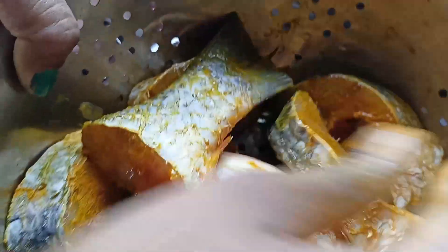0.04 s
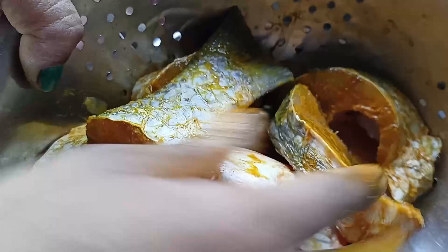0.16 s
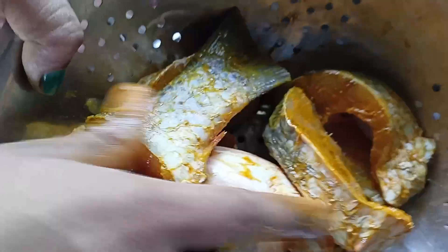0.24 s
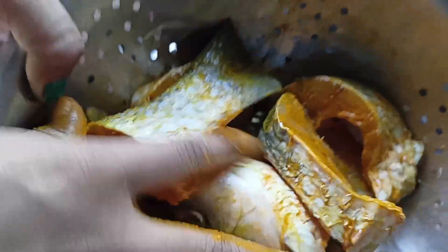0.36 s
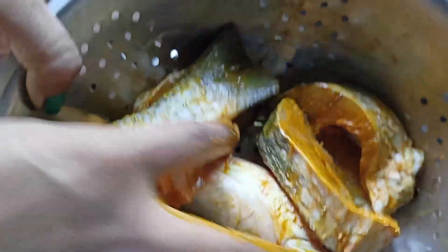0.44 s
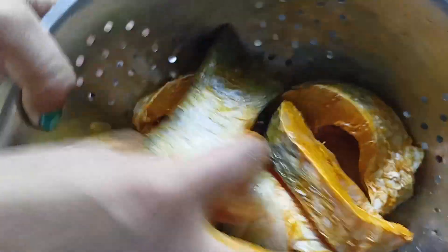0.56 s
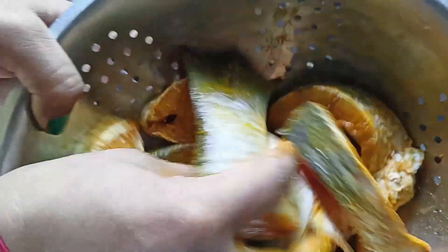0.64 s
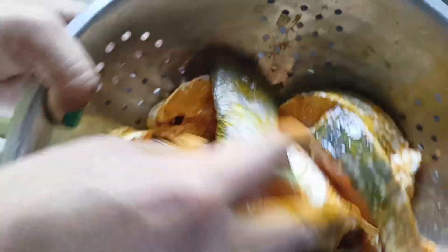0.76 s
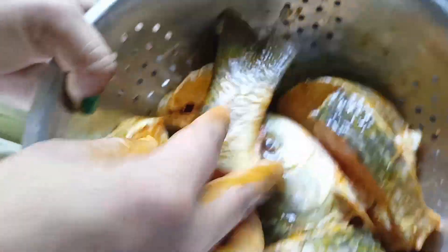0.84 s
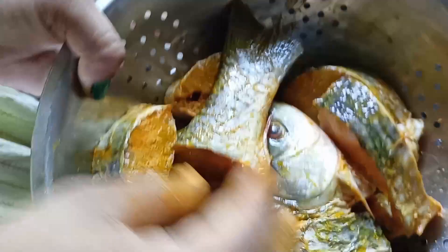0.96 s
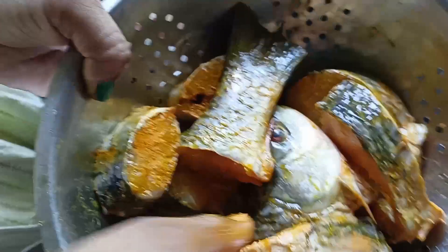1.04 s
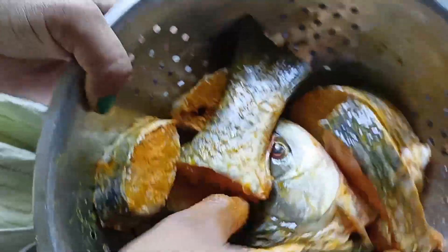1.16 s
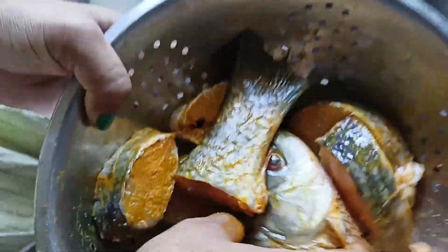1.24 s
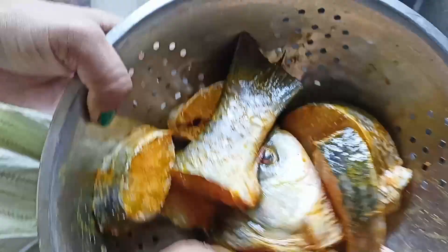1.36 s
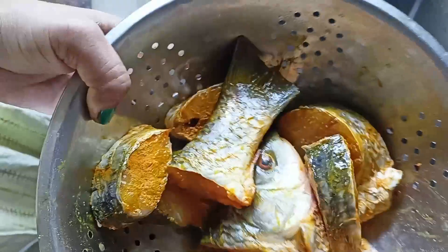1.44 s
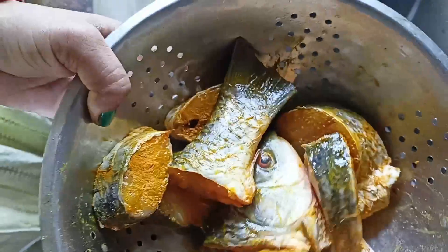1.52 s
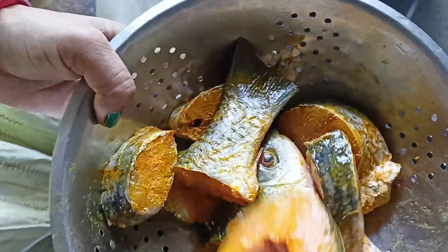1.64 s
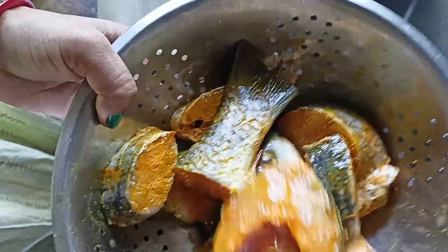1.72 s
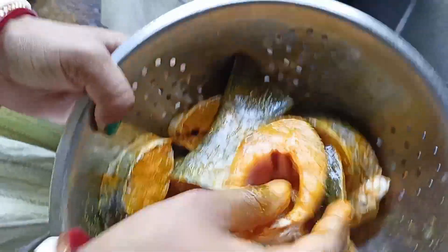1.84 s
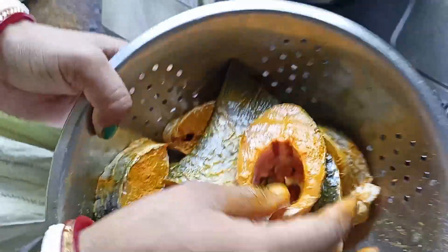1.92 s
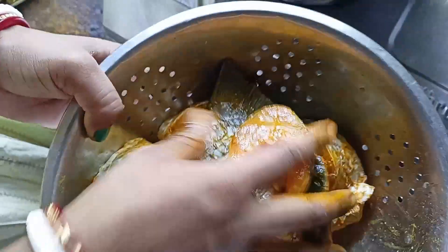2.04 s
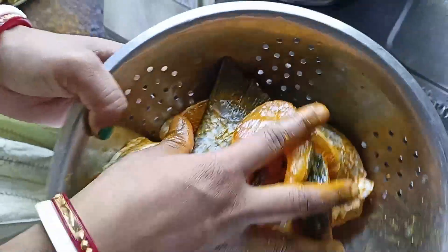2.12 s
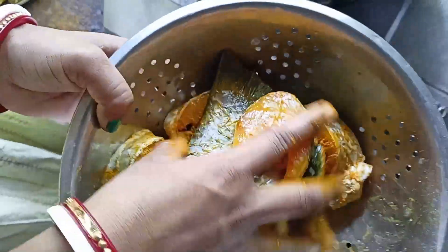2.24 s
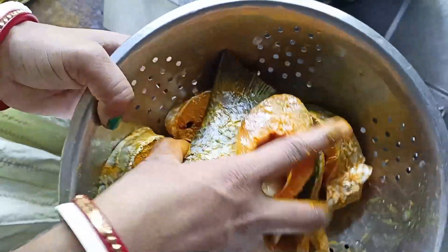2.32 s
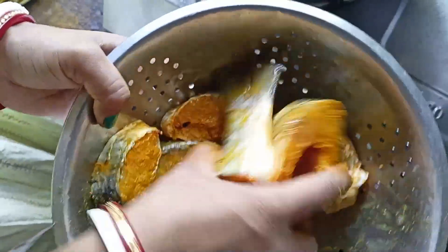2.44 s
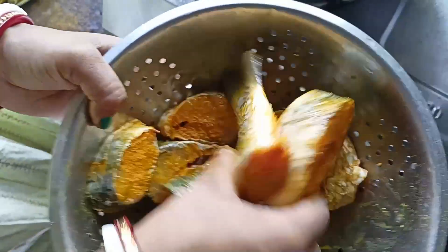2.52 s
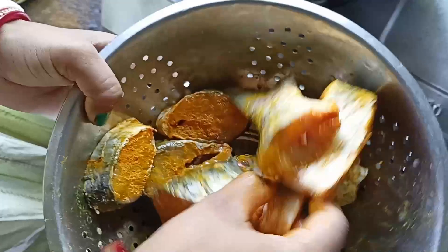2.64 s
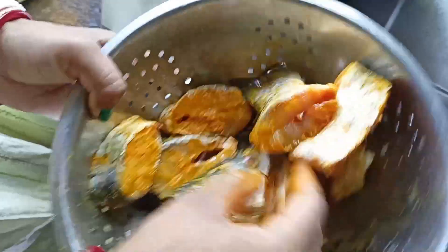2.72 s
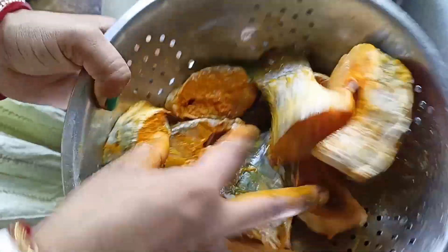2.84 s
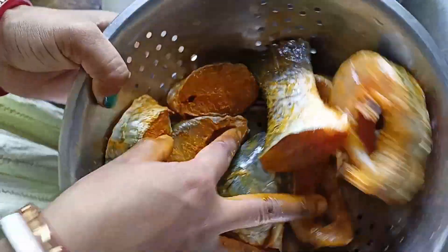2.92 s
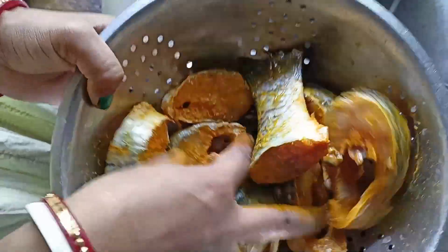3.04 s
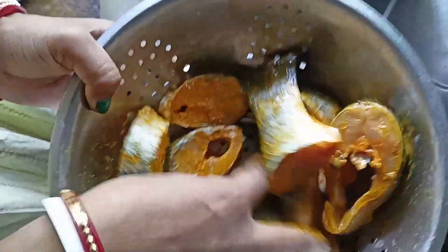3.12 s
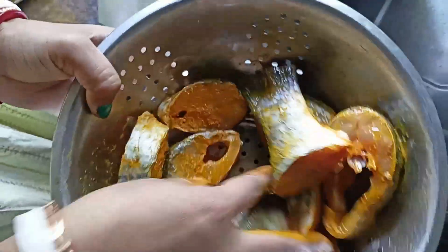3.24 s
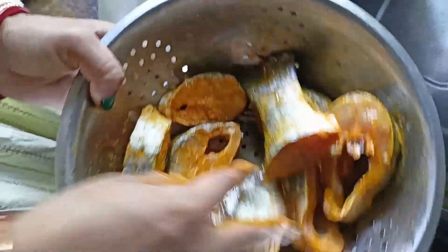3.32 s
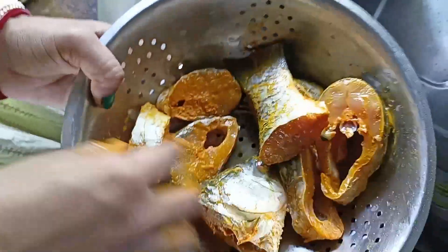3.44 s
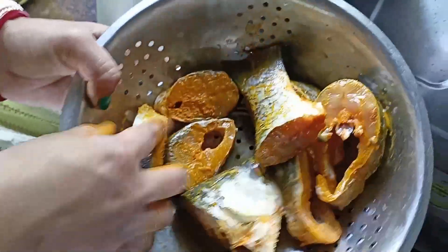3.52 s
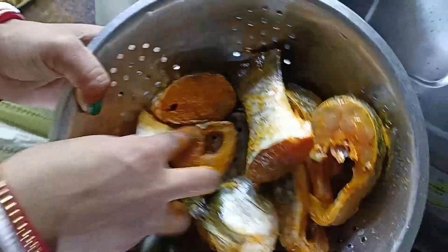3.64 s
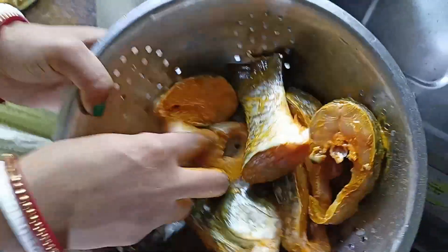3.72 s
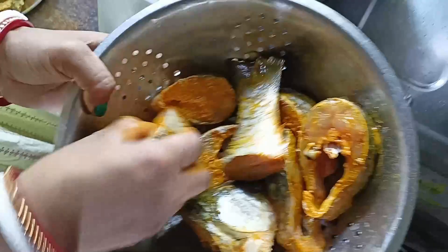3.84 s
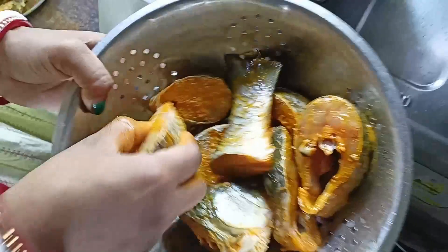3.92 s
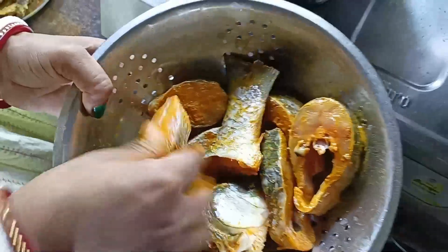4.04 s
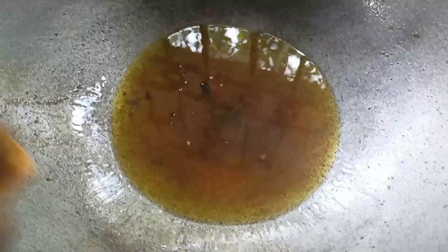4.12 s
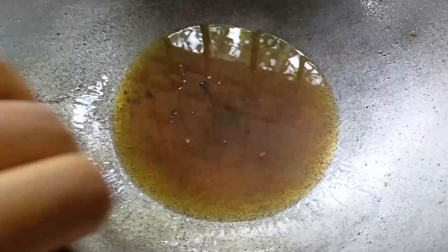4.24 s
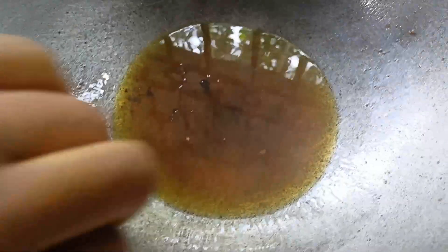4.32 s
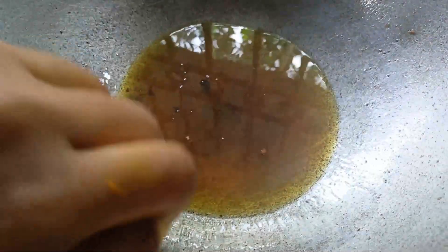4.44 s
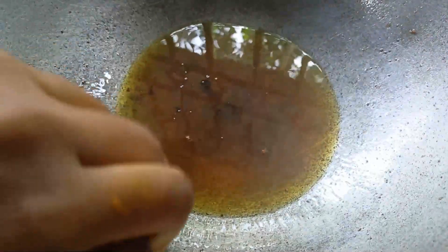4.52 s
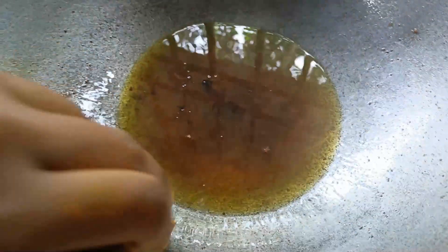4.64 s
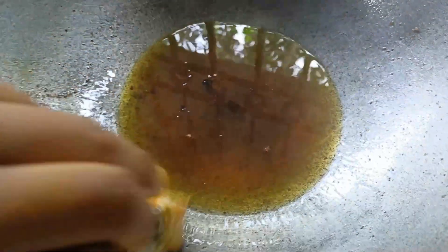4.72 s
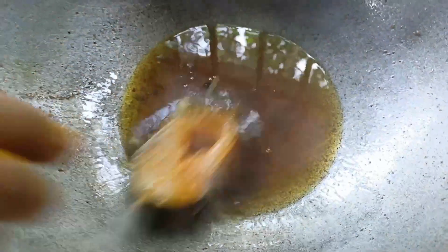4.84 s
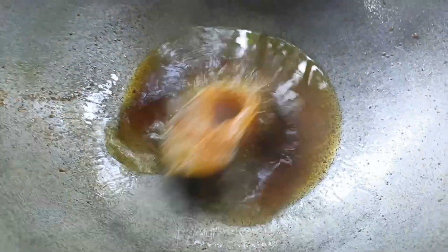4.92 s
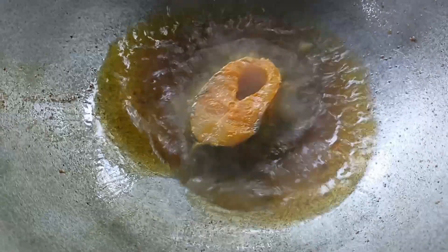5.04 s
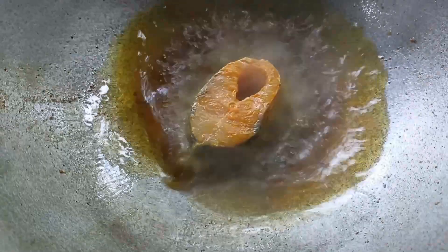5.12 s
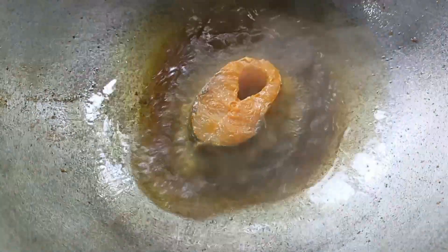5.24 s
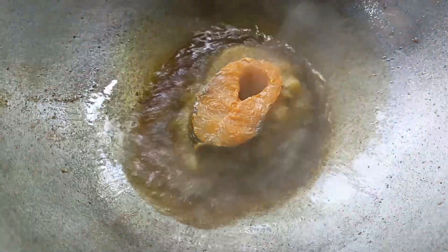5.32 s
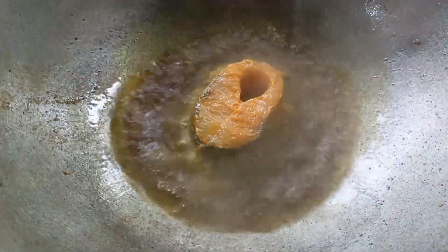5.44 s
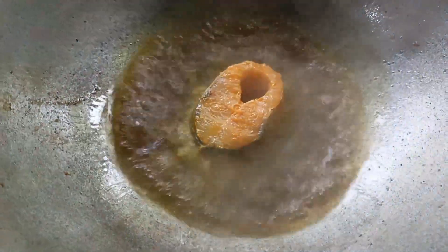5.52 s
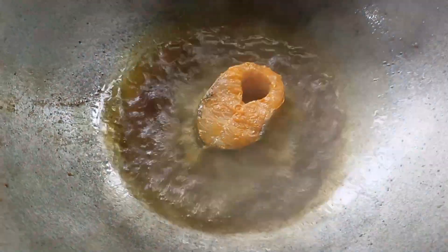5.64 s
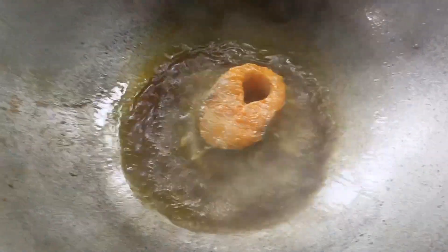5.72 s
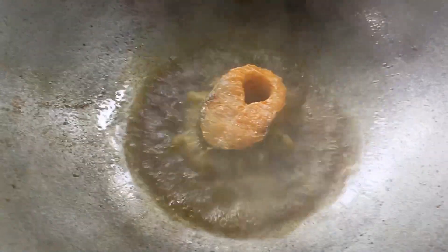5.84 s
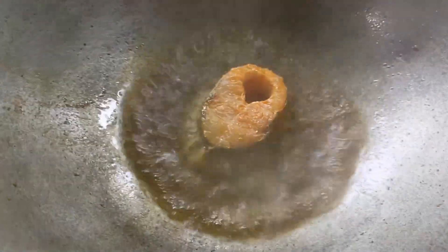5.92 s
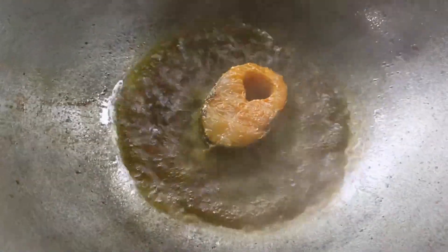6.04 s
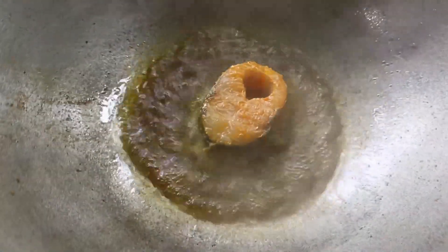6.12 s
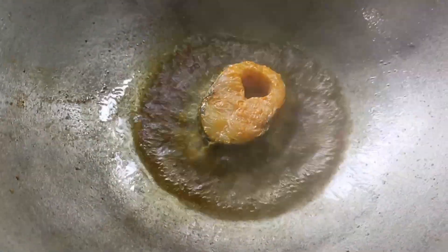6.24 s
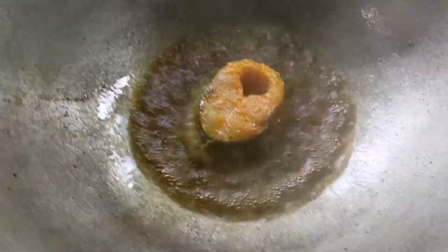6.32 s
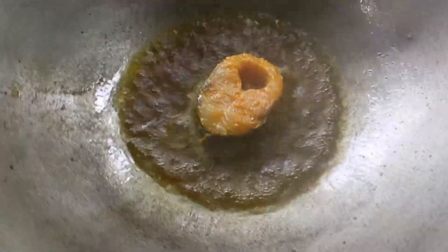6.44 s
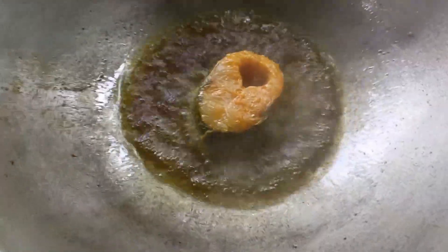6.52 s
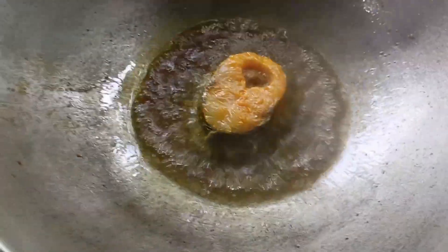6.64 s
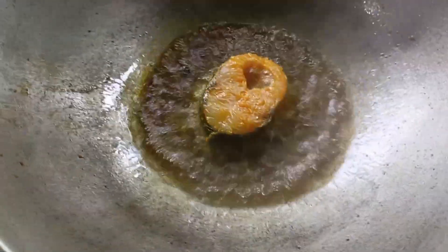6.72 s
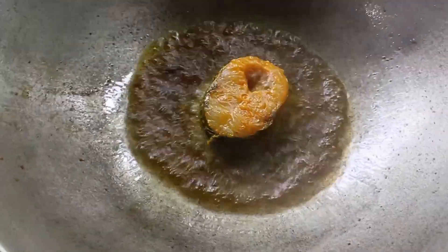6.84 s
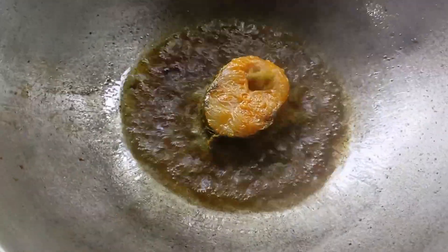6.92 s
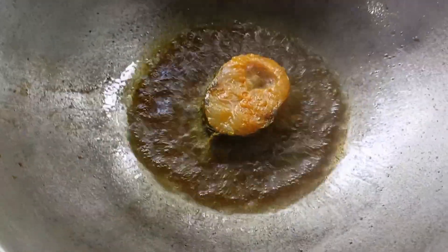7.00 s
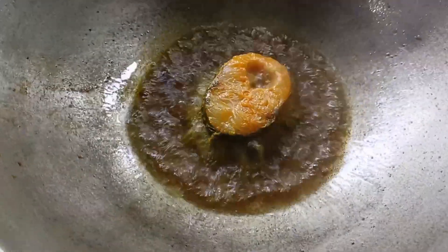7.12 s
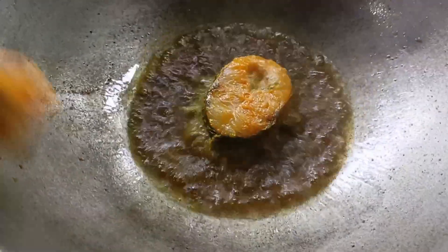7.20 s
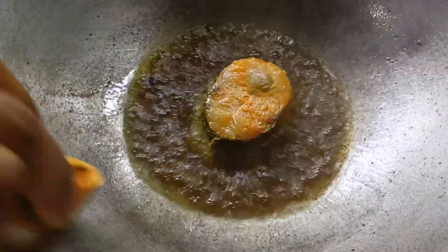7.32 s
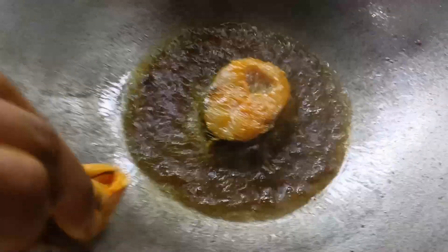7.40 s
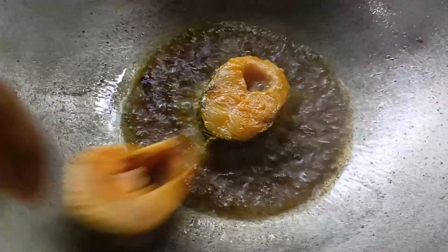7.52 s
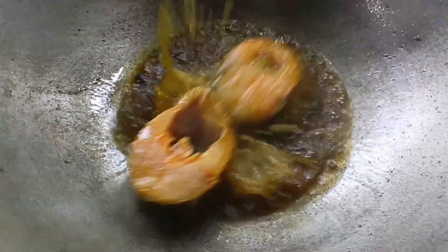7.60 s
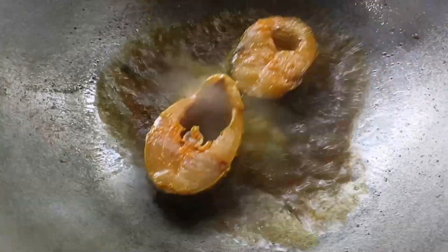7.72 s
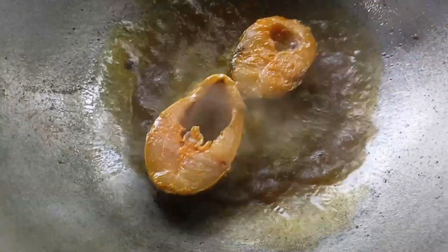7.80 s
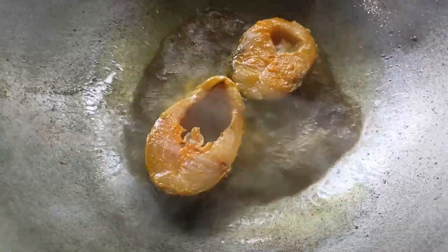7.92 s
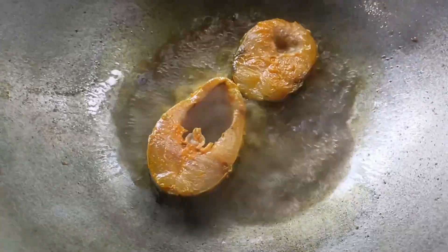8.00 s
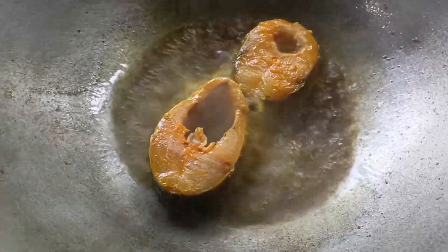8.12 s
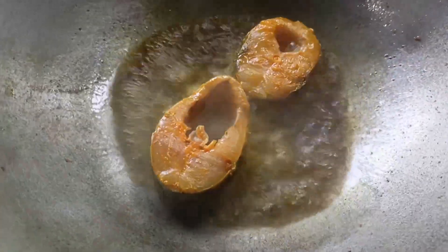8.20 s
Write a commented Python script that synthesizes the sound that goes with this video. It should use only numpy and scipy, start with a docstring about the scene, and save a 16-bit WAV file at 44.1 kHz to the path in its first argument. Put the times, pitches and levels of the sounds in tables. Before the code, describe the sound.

From 0 to about 4.15 seconds, wet fish steaks are turned by hand in a steel colander, heard close up. Uneven strokes of slippery rubbing, low rumble and gritty scraping follow one another, with bangles rattling on the rim. Sharper metallic knocks come near 0.7, 2.25, 2.9 and 3.3 seconds, ringing briefly; soft dull flops of flesh fall around 0.5 and 1.7 to 2.0. A distant bird repeats quick up-and-down whistles, frequent until about 2.1 and sparse afterwards, over faint outdoor murmur. At 4.16 the sound cuts to a near-quiet murmur beside a stove. At 4.63 a thin hiss begins as a steak touches the pan; at 4.9 it drops into oil with a splashy burst. Dense bright sizzling continues, wavering, with pops and thumps crowding between 6.3 and 7.5. Around 7.65 a second steak makes it surge, and frying continues to the end near 8.3.

```python
"""Wet fish steaks are turned by hand in a steel colander, then fried in a wok, in an outdoor kitchen.
Hand and fish rub the steel as dense random slips; bangles knock on the rim as noise bursts and ringing modes.
Soft flesh flops on the bowl, and a far bird calls in gliding sines with noise echoes.
Then the listener stands over the wok: one steak slides into hot oil, a second follows; dense clicks make the
sizzle, short rings and thumps the pops. Coloured noise murmurs behind; both channels are alike."""
import sys
import numpy as np
from scipy import signal
from scipy.io import wavfile

SR = 44100
rng = np.random.default_rng(int(sys.argv[2]) if len(sys.argv) > 2 else 0)


def pcm_store(signal):
    """Save signal as 16-bit PCM."""
    levels = np.round(np.clip(np.atleast_2d(signal), -1, 1) * 32767)
    wavfile.write(sys.argv[1], SR, levels.astype(np.int16).T)


N = 364707

MOVE_S = 4.158   # the listener is at the wok from here on
DROP_S = 4.89    # the first steak drops into the oil

# modes of the colander, stirred by rubbing and knocks: [f/Hz, relative level/dB, t60/s]
COLANDER_MODES = [(265.3, -6.5, 0.39), (334, -28.5, .08), (509, 5.5, 0.083), (546.4, -7, 0.21),
                  (623, -12, .05), (844, -7, 0.13), (991, -9.5, 0.24), (1042, -9.5, 0.19),
                  (1113, -5.5, 0.089), (1287, -10, 0.31), (1495, -2, 0.1), (1552, -6.5, 0.34),
                  (1677, -5, .12), (1895, -10.5, 0.19), (2033, -4.5, 0.041), (2360, -21.5, 0.15)]
BOWL_MODES, WALL_MODES = COLANDER_MODES[:5], COLANDER_MODES[5:]   # below and above 750 Hz


def from_db(db):
    """Gain of a level."""
    return 10 ** (np.asarray(db) / 20)


def rms_one(x):
    """Scaled to rms 1."""
    return x / np.sqrt(np.mean(x ** 2) + 1e-20)


def drift(rate_hz):
    """Slow random wander of rms 1: low-passed noise, computed at every 40th sample and interpolated."""
    r = np.exp(-80 * np.pi * rate_hz / SR)
    noise = rng.standard_normal(N // 40 + 2002)
    slow = signal.lfilter([1], [1, -2 * r, r * r], noise)[2000:]   # the filter has settled
    return np.interp(np.arange(N) / 40, np.arange(len(slow)), rms_one(slow))


def ring(x, hz, t60):
    """Two-pole resonator: a unit click sets a dying sine of starting height 1 ringing."""
    r, w = from_db(-60 / (t60 * SR)), 2 * np.pi * hz / SR
    return signal.lfilter([0, np.sin(w)], [1, -2 * r * np.cos(w), r * r], x + 1e-18)


def struck(modes, blows):
    """Sum of modes, each set ringing by the same chattering blows."""
    return sum(from_db(db) * ring(blows, hz, t60) for hz, db, t60 in modes)


def bandpass(x, low_hz, high_hz):
    """One wide band-pass."""
    return signal.lfilter(*signal.butter(2, [low_hz, high_hz], "band", fs=SR), x + 1e-18)


def highpass(x, low_hz):
    """Bass cut."""
    return signal.sosfilt(signal.butter(3, low_hz, "high", fs=SR, output="sos"), x)


def grains(per_s, spread_db):
    """Random clicks of very uneven size and either sign; rms 1."""
    sizes = from_db(spread_db * np.minimum(rng.exponential(1, N), 6))
    signs = rng.choice([-1, 1], N)
    return rms_one(sizes * signs * (rng.random(N) < per_s / SR))


def clicks(times, db):
    """One-sample impulses."""
    out = np.zeros(N)
    out[np.round(np.asarray(times) * SR).astype(int)] = from_db(db)
    return out


def bursts(times, db, t60):
    """Noise that starts at each time and dies away."""
    envelope, t = np.zeros(N), np.arange(SR // 2) / SR
    for at, level_db, life in zip(times, db, np.broadcast_to(t60, len(times))):
        i = round(at * SR)
        envelope[i:i + len(t)] += from_db(level_db - 60 * t / life)
    return envelope * rng.standard_normal(N)


def swell(start, rise, held, sag_db_per_s, release_db_per_s):
    """Gain that rises to 1, sags while held, then falls at the release rate (a rate of 0 holds it)."""
    t = np.arange(N) / SR - start
    fall = sag_db_per_s * np.clip(t, 0, held) + release_db_per_s * np.maximum(t - held, 0)
    return np.clip(t / rise, 0, 1) * from_db(-np.minimum(fall, 200))


def coloured(sources, spectrum, split_hz=(), shared=0, patchy_db=0):
    """Quarter-octave bank whose bands take the sources in turn; one signal per range between the splits."""
    edges, table = 28 * 2 ** (np.arange(38) / 4), np.array(spectrum)
    out = np.zeros((len(split_hz) + 1, N))
    for k, (low, high) in enumerate(zip(edges, edges[1:])):
        centre_hz = np.sqrt(low * high)
        db = np.interp(np.log(centre_hz), np.log(table[:, 0]), table[:, 1])
        if patchy_db:   # each band wavers on its own
            db = db + patchy_db * drift(16.0)
        sos = signal.butter(2, [low, high], "band", fs=SR, output="sos")
        source = sources[k % len(sources)] + shared + 1e-18
        out[np.searchsorted(split_hz, centre_hz)] += from_db(db) * signal.sosfilt(sos, source)
    return out


def stroke_gains():
    """Every stroke of hand and fish has the same shape; its four levels set the colour."""
    # strokes: [start t/s, held t/s, thud level/dB, rumble level/dB, scrape level/dB, wet slither level/dB]
    strokes = [(0.0, 0.13, -53, -58, -56, -48), (0.128, 0.15, -37, -31.5, -42, -35),
               (0.481, 0.42, -40.5, -52.5, -47.5, -38.5), (0.631, 0.07, -55, -34.5, -42.5, -33),
               (.675, 0.18, -52, -37.5, -38, -32), (0.943, 0.035, -42.5, -48, -50, -34),
               (1.302, 0.29, -36.5, -35.5, -45, -32.5), (1.459, 0.13, -33.5, -33, -37, -35.5),
               (1.619, 0.029, -36.5, -48, -44, -43), (1.72, 0.31, -41.5, -56, -47.5, -63),
               (1.99, 0.11, -43, -38, -41, -45), (2.253, 0.32, -49, -32, -30, -29),
               (2.501, 0.2, -45.5, -35.5, -41.5, -30), (2.788, 0.11, -58, -38.5, -36, -31),
               (2.89, 0.16, -62, -36.5, -36.5, -35), (3.098, 0.15, -54, -42.5, -43.5, -35.5),
               (3.255, 0.18, -83, -41, -38, -36), (3.42, 0.097, -61, -51, -33.5, -35),
               (3.649, 0.14, -53, -49, -56.5, -40.5), (3.721, 0.051, -58, -48, -39, -23),
               (3.759, .1, -56, -45, -32.5, -26.5), (3.869, 0.027, -47.5, -34.5, -30, -38.5),
               (4.0, 0.21, -53.5, -53, -60, -51.5)]
    attack_s, sag_db_per_s, release_db_per_s = 0.028, 24.5, 170.5
    power = np.zeros((4, N))
    for start, held, *levels_db in strokes:
        shape = swell(start, attack_s, held, sag_db_per_s, release_db_per_s)
        power += (from_db(levels_db)[:, None] * shape) ** 2
    grip_uneven_db = 2.5   # the grip slips and catches within a stroke
    return np.sqrt(power) * from_db(grip_uneven_db * drift(14.0))


def rubbing():
    """Dense slips under the hand with wet ticks among them; the slips also stir the colander's modes."""
    # spectrum of hand and fish on steel, relative within each range: [f/Hz, level per Hz/dB]
    rub_colour = [(29, -44.5), (50, -15), (251, -9), (377, -5), (516, -4), (776, -10.5), (1490, -11),
                  (2600, -3.5), (4000, -11), (6000, -7), (7900, -4), (9500, -12.5), (12000, -20),
                  (15700, -15)]
    # borders between thud, rumble, scrape and slither: [f/Hz]
    rub_split = (220, 750, 3500)
    slips = [grains(5000, 2.55) * from_db(2.0 * drift(36)) for _ in range(2)]
    ticks = .8 * grains(150, 4.0)
    ranges = coloured(slips, rub_colour, rub_split, ticks, patchy_db=1.9)
    thud, rumble, scrape, slither = map(rms_one, ranges)
    bowl = rms_one(struck(BOWL_MODES, slips[0]))
    wall = rms_one(struck(WALL_MODES, slips[0]))
    rumble = rms_one(rumble + from_db(-1) * bowl)
    scrape = rms_one(scrape + from_db(-4) * wall)
    return sum(gain * part for gain, part in zip(stroke_gains(), (thud, rumble, scrape, slither)))


def surroundings():
    """Distant outdoor murmur of wind and traffic, then another beside the stove: noise with a wavering hum."""
    # murmur of the yard: [f/Hz, relative level per Hz/dB]
    yard_colour = [(18, -33), (30, -14), (117, -5), (169, -25), (317, -8.5), (469, -19), (2200, -29),
                   (4350, -24), (8160, -30.5), (10600, -46), (15700, -30.5)]
    # murmur beside the stove: [f/Hz, relative level per Hz/dB]
    stove_colour = [(18, -30), (50, -16), (103, -10), (371, -16), (1090, -28.5), (6400, -29.5), (7400, -43),
                    (8600, -39.5), (10300, -21.5), (12000, -48), (15700, -52)]
    # narrow noise heard as a hum, one row before and one after the move: [f/Hz, width/Hz, level/dB]
    hums = [(326, 20, -50), (428, 8, -65)]
    yard_db, stove_db = -49.5, -55.5
    white = rng.standard_normal((2, N))
    yard = from_db(yard_db) * rms_one(coloured(white, yard_colour, patchy_db=1.0)[0])
    stove = from_db(stove_db) * rms_one(coloured(white, stove_colour, patchy_db=1.0)[0])
    yard_hum, stove_hum = (from_db(db) * rms_one(ring(white[0], hz, 2.7 / width)) for hz, width, db in hums)
    return np.where(np.arange(N) < MOVE_S * SR, yard + yard_hum, stove + stove_hum)


def bird():
    """Two-note whistles, a rising glide then a falling one, smeared by echoes off walls and trees."""
    # starts of the calls: [t/s]
    calls = [.09, .255, .415, .565, .73, .88, 1.045, 1.21, 1.385, 1.555, 1.72, 1.89, 2.09, 2.76, 3.595,
             3.975, 4.13]
    # notes of a call: [start t/s, length t/s, from f/Hz, to f/Hz, relative level/dB]
    notes = [(.001, .03, 3800, 4400, -3), (.03, .022, 3300, 2800, -6)]
    whistle_db = -48.5   # ahead of the mix with the echoes
    whistles = np.zeros(N)
    for at in calls:
        for start, length, from_hz, to_hz, note_db in notes:
            u = np.arange(round(length * SR)) / (length * SR)
            hz = (from_hz + (to_hz - from_hz) * np.sqrt(u)) * rng.normal(1, 0.0032)
            tone = np.sin(np.pi * np.sqrt(u)) * np.sin(2 * np.pi * np.cumsum(hz) / SR)
            i = round((at + start) * SR)
            whistles[i:i + len(u)] += from_db(whistle_db + note_db) * tone
    t = np.arange(SR // 4) / SR
    echoes = rng.standard_normal(len(t)) * from_db(-23 - 60 * t / .3)   # t60 0.3 s
    return .5 * whistles + signal.fftconvolve(whistles, echoes)[:N]


def knocks():
    """A crack and a dying rattle on top; below, a dull clunk and the damped ring of bowl and wall."""
    # knocks of bangles on the colander, levels relative within each layer:
    # [t/s, rattle level/dB, bowl level/dB, wall level/dB, rattle t60/s (kept within 0.01 to 0.4)]
    knock_table = [(0.131, -26, -16, -44, 0.11), (0.374, -40, -58.5, -38, 0.0085),
                   (0.483, -58, -24.5, -31, 0.06), (0.598, -23.5, -30, -51, 0.031),
                   (0.677, -18.5, -39, -19, 0.42), (0.686, -14.5, -8, -4.5, 0.049),
                   (0.697, -9.5, -56, -36, 0.031), (0.869, -28, -40, -26.5, 0.049),
                   (0.949, -25.5, -49, -51, 0.06), (1.007, -23.5, -23, -28, 0.019),
                   (1.399, -25.5, -30, -48, 0.074), (1.433, -26, -33, -25, 0.11),
                   (1.471, -15.5, -37, -34, 0.053), (1.519, -23, -39, -46, 0.1),
                   (1.685, -31, -52, -50, 0.014), (1.725, -55, -31, -34, 0.052),
                   (2.002, -53, -23, -44, 0.11), (2.026, -34, -29, -30, 0.14),
                   (2.257, -16, -13, 4.5, 0.081), (2.38, -20.5, -20, -44, 0.02),
                   (2.408, -19, -25, -31.5, 0.053), (2.473, -13, -27, -12, 0.031),
                   (2.503, -20, -43, -48, 0.024), (2.528, -40, -17.5, -28, 0.045),
                   (2.567, -20.5, -27.5, -27, 0.069), (2.637, -30, -47, -47, 0.02),
                   (2.659, -24.5, -29, -36, 0.041), (2.801, -29, -16.5, -29, 0.053),
                   (2.859, -10, -37, -45, 0.033), (2.894, -14, -21, -1, 0.21), (3.144, -27, -36, -73, 0.14),
                   (3.258, -28, -14, -17, 0.25), (3.278, -15.5, -31, -42, 0.041),
                   (3.313, -13, -14, -0.5, 0.15), (3.421, -20, -42, -14, 0.041),
                   (3.435, -14, -45, -23, 0.079), (3.731, -31.5, -47, -47, 0.33),
                   (3.784, -16.5, -44, -53, 0.023), (3.811, -17, -23, -31, 0.035),
                   (3.825, -17, -33, -41, 0.027), (3.861, -17.5, -19.5, -18.5, 0.095)]
    s, rattle_db, bowl_db, wall_db, t60 = np.transpose(knock_table)
    chatter = bursts(s, rattle_db, np.clip(t60, .01, .4))
    rattle = from_db(-5.5) * bandpass(chatter, 3300, 17000)
    crack = bandpass(bursts(s, rattle_db + 9, .007), 4500, 11000)
    # crowded modes of bangles and rim
    pitches_hz = rng.uniform(5600, 9000, 60)
    jingle = from_db(-42) * struck([(hz, 0, 0.05) for hz in pitches_hz], chatter)
    bowl_ring = struck(BOWL_MODES, bursts(s, bowl_db - 26, 0.018))
    wall_ring = struck(WALL_MODES, bursts(s, wall_db - 35, 0.034))
    wall_clunk = bandpass(bursts(s, wall_db - 6.0, 0.15), 920, 1570)
    bowl_clunk = bandpass(bursts(s, bowl_db - 1, 0.12), 300, 630)
    return rattle + crack + jingle + highpass(bowl_ring + wall_ring + wall_clunk + bowl_clunk, 250)


def flops():
    """Soft flesh on the bottom of the bowl: short dull thumps with no ring, clicks band-passed twice."""
    # flops: [t/s, click level ahead of the filters/dB]
    flop_table = [(0.499, 8), (1.725, 10.5), (1.747, 9), (1.766, 8), (1.799, 4), (1.862, 6), (1.955, 6),
                  (1.985, 12)]
    return bandpass(bandpass(clicks(*np.transpose(flop_table)), 110, 410), 90, 580)


def steam_thump(x):
    """A steam pocket's thump: each click becomes a short broad push."""
    return bandpass(x, 290, 1480)


def fry_gains():
    """Bubbling, fizz and spray all follow the vigour of the frying; splashes add spray."""
    # vigour, as level of the fizz: [t/s, level/dB]
    vigour = [(4.66, -25), (4.82, -24.5), (4.9, -19.5), (4.96, -14), (5.0, -19.5), (5.32, -18.5),
              (5.62, -16), (5.84, -20.5), (6.02, -19), (6.22, -22.5), (6.38, -17.5), (6.55, -20),
              (6.8, -17.5), (7.08, -18), (7.27, -20), (7.66, -15), (7.8, -14.5), (8.05, -18.5), (8.27, -16)]
    # fresh water meets the fat and throws extra spray: [t/s, level/dB]
    splashes = [(4.64, -20), (4.76, -18), (4.885, -13), (7.64, -17.5)]
    touch_s, catch_s = 4.627, 0.01   # the first steak touches the hot pan; the fizz takes this long to catch
    splash_rise_s, splash_fade_db_per_s = 0.028, 86
    t = np.arange(N) / SR
    fizz = from_db(np.interp(t, *np.transpose(vigour))) * swell(touch_s, catch_s, 0, 0, 0) ** 2

    # the bubbling grows, wanders, and is weaker while the steak only slides on the pan
    bubbling = from_db(-31 + 1.5 * (t - DROP_S) + 2 * drift(1.33))
    sliding = from_db(-8) * (t > touch_s)
    bubbling = bubbling * np.maximum(swell(DROP_S, 0.036, 0, 0, 0), sliding)
    follows = 0.54   # the bubbling follows this share of the vigour's swing in dB

    spray = fizz * from_db(-3 + 2 * drift(1.3))
    splash_power = sum((from_db(db) * swell(s, splash_rise_s, 0.024, 0, splash_fade_db_per_s)) ** 2
                       for s, db in splashes)
    return fizz ** follows * bubbling, fizz, np.sqrt(spray ** 2 + splash_power)


def frying():
    """Thousands of tiny steam bubbles burst in the oil; larger ones snap across all bands, the largest thump."""
    # spectrum of the frying, relative within each range: [f/Hz, level per Hz/dB]
    fry_colour = [(24, -85), (40, -85), (101, -54), (224, -28.5), (452, -24.5), (641, -23), (865, -23.5),
                  (1880, -19), (2180, -22.5), (4180, 9), (4970, 5), (7610, -10), (10500, 1), (15700, -11.5)]
    # borders between bubbling, fizz and spray: [f/Hz]
    fry_split = (2600, 7500)
    # the pan rings under the bubbling: [f/Hz, relative level/dB, t60/s]
    wok_modes = [(643.3, 4, 0.11), (1280, -5, 0.099), (1870, -6.5, 0.2)]
    # while the hand hangs over the oil the gap rings, until the steak drops: [f/Hz, width/Hz, relative level/dB]
    hand_gap = [(3720, 260, -5), (3080, 200, -18)]
    bubbles = [grains(9000, 2.02) * from_db(1.22 * drift(40)) for _ in range(2)]
    snaps = .6 * grains(700, 5.0)
    ranges = coloured(bubbles, fry_colour, fry_split, snaps, patchy_db=0.23)
    bubbling, fizz, spray = map(rms_one, ranges)

    thumps = rms_one(steam_thump(grains(90, 2.5)))
    pan = rms_one(struck(wok_modes, bubbles[1]))
    bubbling = rms_one(bubbling + from_db(-9) * thumps + from_db(-11) * pan)

    # bubbles of middle size ring about a dozen cycles, each size at its own pitch
    rings = sum(ring(grains(40, 4.0), hz, 12 / hz) for hz in np.geomspace(3800, 5200, 8))
    fizz = rms_one(fizz + from_db(-9) * rms_one(highpass(rings, 2800)))

    gap = sum(from_db(db) * rms_one(ring(bubbles[0], hz, 2.2 / width)) for hz, width, db in hand_gap)
    under_hand = highpass(bandpass(fizz, 3650, 9000), 3300) + highpass(gap, 2400)
    fizz = np.where(np.arange(N) < DROP_S * SR, under_hand, fizz)
    return sum(gain * part for gain, part in zip(fry_gains(), (bubbling, fizz, spray)))


def pops():
    """Bursting steam pockets: a short ringing snap and a thump of displaced oil; slops are half-sine pushes."""
    # the loudest pockets, as clicks ahead of the filters: [t/s, snap level/dB, thump level/dB]
    pop_table = [(4.938, -25, 5.5), (5.052, -6, 1.5), (5.084, -25, -1), (5.196, -22, 0), (5.69, -11, 2),
                 (6.008, -16, 1), (6.348, -7, -11), (6.438, -6, 5), (6.637, -6, -6), (6.729, -2, 8),
                 (6.776, -3, 9.5), (6.883, -7, 8), (6.994, -22, 4.5), (7.126, -7, 5.5), (7.156, -4.5, 6),
                 (7.24, -14, 6.5), (7.399, -25, 4), (7.419, -8, 6), (7.496, -5, 7.5), (7.537, -10, 5.5),
                 (7.726, -21, 5), (7.915, -11, -17), (7.939, -15, -12), (8.204, -5, -15)]
    # oil slops against the wok: [t/s, level/dB]
    slop_table = [(4.935, -25), (5.05, -38), (7.914, -31)]
    s, snap_db, thump_db = np.transpose(pop_table)
    # smaller pops come by chance after the drop, 5 per second
    small = (rng.random(N) < 5 / SR) * (np.arange(N) > DROP_S * SR) * from_db(rng.normal(0, 4.7, N))
    snaps = clicks(s, snap_db) + from_db(-20) * small
    thumps = clicks(s, thump_db) + from_db(-8) * small
    snap_ring = highpass(ring(snaps, 4240, 0.016), 2100) + from_db(-6) * ring(snaps, 9400, 0.0047)
    push = np.sin(np.linspace(0, np.pi, round(0.0037 * SR)))
    slops = np.convolve(clicks(*np.transpose(slop_table)), push)[:N]
    return steam_thump(thumps) + snap_ring + slops


def scene():
    """Colander and bird first, wok after; both channels alike."""
    before_move = np.arange(N) < MOVE_S * SR
    colander = (rubbing() + bird() + knocks() + flops()) * before_move
    wok = highpass(frying(), 110) + pops()
    return np.tile(colander + wok + surroundings(), (2, 1))


def record(dry):
    """Bass roll-off, peaks flattened near full scale, the top cut."""
    x = highpass(dry, 45)
    x = x / (1 + (x / .97) ** 8) ** .125   # bends towards a ceiling of 0.97
    cutoff_hz = 15780
    return signal.sosfilt(signal.ellip(12, .5, 80, cutoff_hz, fs=SR, output="sos"), x)


dry = scene()
out = record(dry)
pcm_store(out)
```